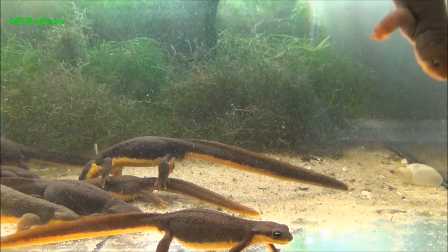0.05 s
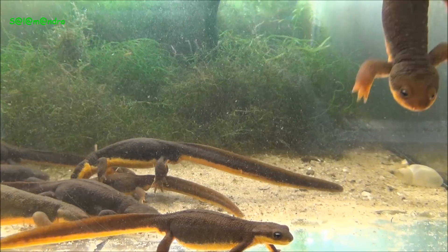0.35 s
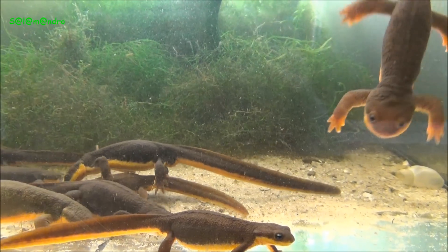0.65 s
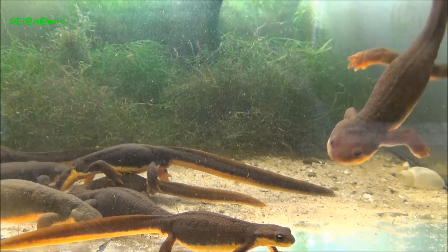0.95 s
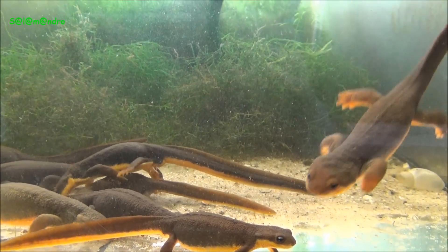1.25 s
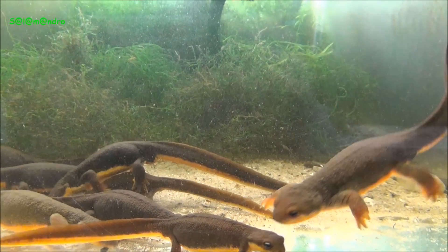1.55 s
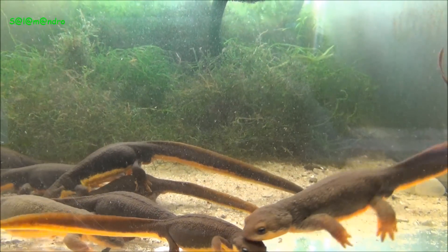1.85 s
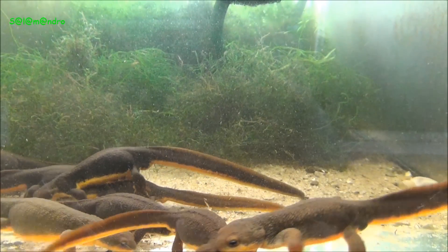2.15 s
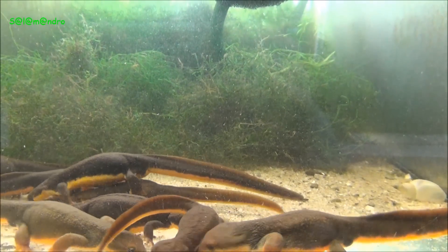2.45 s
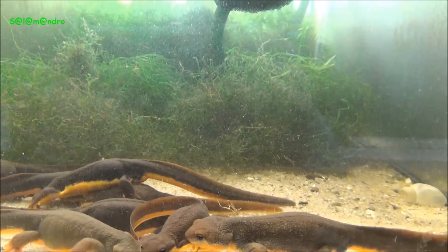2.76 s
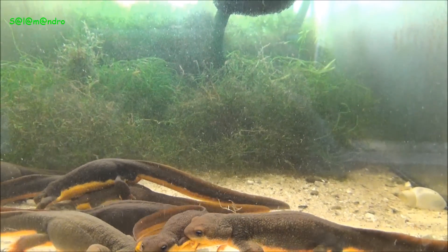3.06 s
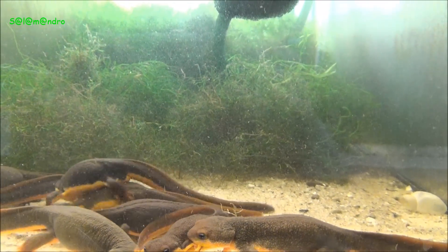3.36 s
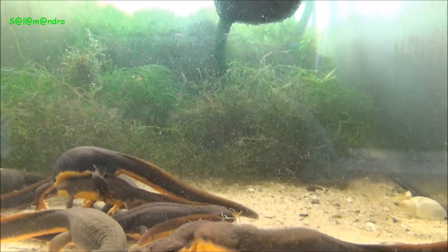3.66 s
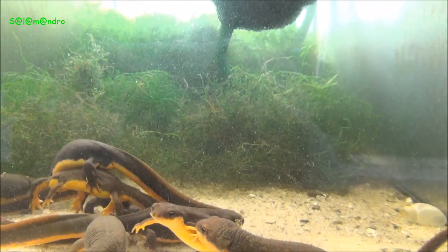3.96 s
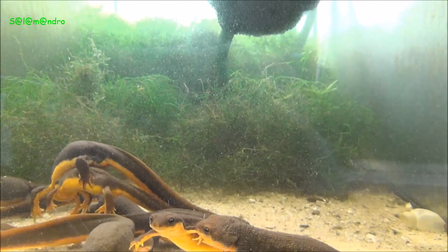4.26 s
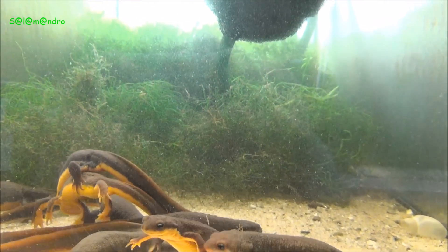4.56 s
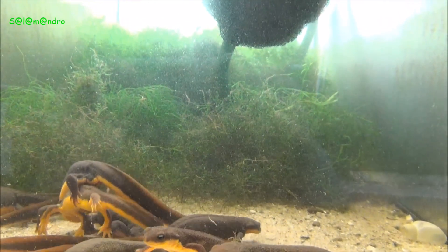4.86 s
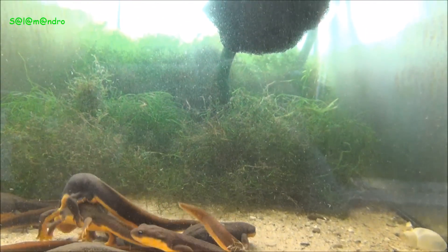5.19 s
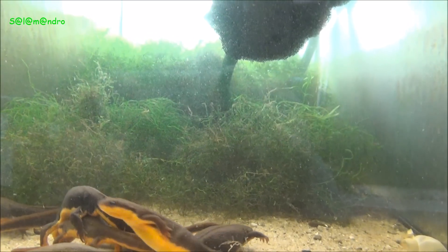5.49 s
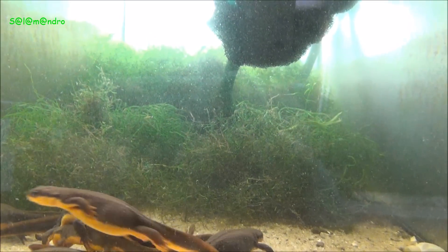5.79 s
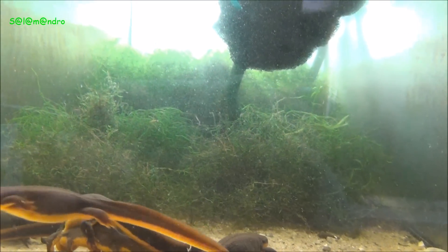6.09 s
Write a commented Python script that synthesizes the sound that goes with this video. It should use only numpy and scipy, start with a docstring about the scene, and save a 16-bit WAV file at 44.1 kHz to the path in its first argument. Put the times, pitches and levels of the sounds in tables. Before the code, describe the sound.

Close to the glass of an indoor aquarium, a pump hums steadily while circulating water rumbles, gurgles and fizzes with tiny bubbles. The hand-held camera adds a high whirr and faint finger rustles. A sharp plastic click about a second and a half in makes the background dip and slowly swell back. Another click follows, and near the end comes a cluster of clicks and rubbing on the casing.

```python
"""At an aquarium, close to the glass, a pump hums on 50 Hz mains power while the moving water
rumbles, gurgles and hisses softly with tiny bubbles. A hand-held camera adds its own whirr and a thin
whistle from its screen; fingers rub its plastic casing and make it click. The loudest click pushes
the camera's gain (its volume) down, and the hum takes about two seconds to swell back."""
import sys
import numpy as np
from scipy import signal
from scipy.fft import rfft, irfft
from scipy.io import wavfile
from scipy.ndimage import uniform_filter1d, minimum_filter1d

SR = 44100
rng = np.random.default_rng(int(sys.argv[2]) if len(sys.argv) > 2 else 0)


def output_pcm(signal):
    """Save a mono or channel-first signal as 16-bit PCM at the path in sys.argv[1].

    Samples are clipped to [-1, 1] before scaling.
    """
    pcm = np.clip(np.atleast_2d(signal).T, -1, 1) * 32767
    wavfile.write(sys.argv[1], SR, np.round(pcm).astype(np.int16))


N = 274743
T = np.arange(N) / SR
MAINS_HZ = 50


def undb(db):
    """Turn decibels into a number to multiply a sound by."""
    return 10 ** (np.asarray(db) / 20)


def unit(x):
    """Scale a signal so that its average strength (rms) is 1."""
    return x / np.sqrt(np.mean(x ** 2))


def pan(db):
    """Left and right gains, with the left louder by db."""
    return undb(np.array([[db], [-db]]) / 2)


def spread(mid, side, side_db):
    """Make stereo: both ears share mid; side is added on the left and taken away on the right."""
    return mid + undb(side_db) * side * np.array([[1], [-1]])


def noise():
    """White noise: an even mix of all pitches."""
    return rng.standard_normal(N)


def wander(per_s):
    """A smooth random curve, about 1 in size, that heads for a new value per_s times a second."""
    hold = int(SR / per_s)
    steps = np.repeat(rng.standard_normal(N // hold + 2), hold)
    return unit(uniform_filter1d(uniform_filter1d(steps, hold), hold)[:N])


def grains(per_s, scatter_db):
    """Tiny ticks of uneven size at random moments."""
    sizes = undb(scatter_db * np.minimum(rng.exponential(size=N), 4))
    return unit((rng.random(N) < per_s / SR) * np.sign(noise()) * sizes)


def response(points, size):
    """Join (pitch_hz, level_db) points into a curve with a gain for every pitch."""
    hz, db = np.transpose(points)
    pitches = np.maximum(np.fft.rfftfreq(size, 1 / SR), 1)
    return undb(np.interp(np.log(pitches), np.log(hz), db))


def colour(x, points):
    """Shape a sound's tone with (pitch_hz, level_db) points; the result has strength 1."""
    size = x.shape[-1]
    return unit(irfft(rfft(x) * response(points, size), size))


def resonate(x, hz, width_hz):
    """Keep a narrow band around one pitch, filtering twice for steeper edges."""
    b, a = signal.iirpeak(min(hz, .45 * SR), hz / width_hz, fs=SR)
    return unit(signal.lfilter(b, a, signal.lfilter(b, a, x)))


# The tones in the pump's hum: mains_multiple, level_db, left_minus_right_db, waver_db
HUM_TONES = [(1, -60, -6, 1), (2, -46, -10.5, 0.7), (4, -54, -10, 3), (6, -37, -3, 1)]

def pump(drone_hz=885, growth_db_per_s=0.92):
    """The motor shakes the tank, each tone wavering with the load; a higher drone slowly grows."""
    hum = 0
    for multiple, db, pan_db, waver_db in HUM_TONES:
        phase = 2 * np.pi * (round(multiple) * MAINS_HZ * T + rng.random())
        phase += 0.079 * waver_db * wander(4.6)
        hum = hum + np.sqrt(2) * np.sin(phase) * undb(db + waver_db * wander(7.4)) * pan(pan_db)
    mid, side = (resonate(noise(), drone_hz, width_hz=67) for _ in range(2))
    return hum + undb(-52 + growth_db_per_s * T) * spread(mid, side, side_db=-17) * pan(-2.4)


# How much the water differs between left and right: pitch_hz, side_minus_mid_db
WATER_WIDTH = [(25, 1), (60, 7), (130, -14), (300, -19.5), (700, -12), (1300, -20), (2200, -58),
               (16000, -36)]

def widen(x):
    """Spread a water sound between the ears, most of all in the deep bass."""
    side = irfft(rfft(noise()) * response(WATER_WIDTH, N), N)
    return spread(x, side, side_db=0)


# The tone of the churning water: pitch_hz, relative_level_db
CHURN_TONE = [(20, -31), (45, -19), (110, -13.5), (150, -6), (192, -1), (215, -5.5), (280, -1.5), (325, 0),
              (420, -3), (480, -10), (780, -12), (1000, -16), (1700, -26.5), (4000, -79)]

def churn():
    """Pumped water circles the tank with a nearly even rumble."""
    return colour(widen(noise()), CHURN_TONE) * undb(-37.5 + .5 * wander(4.94)) * pan(-2)


def gurgle():
    """The tank's lowest resonance, a pitch it naturally rings at, gurgles on and off."""
    return resonate(noise(), hz=192, width_hz=34) * undb(-45.5 + 3 * wander(18)) * pan(-7.5)


def glass_echoes(x, echo_db=-12, longest_s=.03, count=40):
    """Quick echoes off the panes and nearby walls boost some pitches and weaken others."""
    delays = rng.integers(80, int(longest_s * SR), count)
    echoes = sum(rng.choice([-1, 1]) * np.roll(x, delay, axis=-1) for delay in delays)
    return unit(x + undb(echo_db) * echoes / np.sqrt(count))


# The tone of the water's hiss: pitch_hz, relative_level_db
HISS_TONE = [(500, -15.5), (1200, -0.5), (1750, -2), (2100, 1.6), (3200, -0.1), (4000, 3), (5200, -1),
             (8000, -1.5), (10500, -4), (12500, -10.5), (15500, -12.5)]

def hiss():
    """Moving water hisses with a fine fizz, in small, uneven swells."""
    fizzy = noise() + 0.37 * grains(per_s=700, scatter_db=1.5)
    return glass_echoes(colour(widen(fizzy), HISS_TONE)) * undb(-40 + 0.9 * wander(24))


def bubbles(per_s=190, low_hz=2100, high_hz=5500, ring_cycles=130, rise=.04, size=4096):
    """Each tiny bubble in the outflow rings with a short ping that rises a little in pitch."""
    out = np.zeros(N + size)
    t = T[:size]
    for when, pitch, bulk in rng.random((int(per_s * N / SR), 3)):
        hz = low_hz * (high_hz / low_hz) ** pitch
        age = t * hz / ring_cycles  # reaches 1 when the ping has faded by 60 dB
        fade = np.exp(-np.log(1000) * age) * np.minimum(20 * age, 1)
        ping = np.sin(2 * np.pi * hz * t * (1 + rise * age / 2)) * fade
        level_db = -47.5 + 1.8 * min(-np.log(1 - bulk), 2)
        start = int(when * N)
        out[start:start + size] += undb(level_db) * ping
    return out[:N]


# The tone of the camera motor's broad whirr: pitch_hz, relative_level_db
WHIRR_TONE = [(4000, -77), (5500, -8), (6200, 6.5), (6900, 6), (7600, 8), (8450, 2), (8700, -1.5),
              (12000, -44.5)]
# The narrow bands where the motor rings: pitch_hz, base_width_hz, level_db
MOTOR_RINGS = [(2514, 8.8, -69.5), (5600, 21, -58), (5880, 54, -76), (5990, 19, -53.5), (6410, 116, -46.5),
               (6600, 39, -54), (8240, 40, -53), (8420, 23, -53.5), (10800, 60, -65)]

def camera_motor():
    """The camera's drive motor whirrs and rings at a few high pitches that waver in loudness."""
    band = spread(colour(noise(), WHIRR_TONE), colour(noise(), WHIRR_TONE), side_db=-6)
    whirr = glass_echoes(band) * undb(-39 + 0.49 * wander(27))
    for hz, base_width_hz, db in MOTOR_RINGS:
        mid, side = (resonate(noise(), hz, 1.3 * base_width_hz) for _ in range(2))
        whirr += undb(db + 1.2 * wander(7)) * spread(mid, side, side_db=-7)
    return whirr


def screen_whistle(line_hz=15625):
    """The camera's screen whistles as it draws its lines, fading during each sweep down the picture."""
    fade = np.exp(-(T * MAINS_HZ % 1) / .2)
    return undb(-59.5) * resonate(fade * np.sin(2 * np.pi * line_hz * T), line_hz, width_hz=700)


# Light finger brushes on the casing: middle_s, length_s, pitch_hz, width_share_of_pitch, level_db
FINGER_BRUSHES = [(0.113, 0.048, 2610, 0.11, -39.5), (.135, 0.057, 4170, .13, -40),
                  (.36, 0.28, 7700, 0.32, -38.5), (.425, .04, 10500, .4, -43),
                  (0.463, 0.046, 2590, .09, -46), (.58, .04, 4100, 0.23, -45),
                  (0.894, 0.05, 7500, 0.2, -34.5), (0.938, 0.037, 9000, 0.64, -42),
                  (1.116, 0.036, 2200, 0.65, -43.5), (1.223, 0.03, 4040, 0.13, -42),
                  (1.228, 0.022, 2300, 0.1, -44), (1.34, 0.027, 4400, .2, -44), (1.79, .04, 9500, .15, -41),
                  (2.416, .059, 2610, 0.16, -41.5), (2.41, .04, 4400, .2, -45),
                  (2.676, .06, 7460, 0.2, -35), (3.417, 0.067, 2460, 0.26, -39.5),
                  (3.595, 0.076, 4100, 0.27, -43), (3.86, 0.091, 6340, 1.1, -41),
                  (4.045, 0.14, 3900, 0.44, -44), (4.064, 0.14, 7900, 0.24, -40),
                  (4.233, 0.028, 8600, 0.13, -41), (4.28, 0.12, 6000, 1.2, -38),
                  (4.353, 0.038, 5700, 0.17, -40), (4.581, 0.033, 4300, .4, -40),
                  (4.833, 0.076, 3700, 0.23, -45.5), (5.175, 0.028, 4200, 0.21, -38),
                  (5.223, 0.07, 3940, 0.16, -37.5), (5.566, 0.098, 4300, 0.29, -43),
                  (5.653, 0.054, 2300, 0.22, -44), (5.83, 0.12, 3700, 0.93, -35),
                  (5.857, .04, 9700, .2, -42), (5.912, 0.065, 7300, 0.32, -35.5), (6, 0.062, 8450, .3, -35)]

def finger_brushes():
    """Skin sticks and slips on plastic; the tiny slips blur into short, pitched rustles."""
    out = np.zeros(N)
    slips = grains(per_s=2000, scatter_db=2)
    for middle_s, length_s, hz, width_share, db in FINGER_BRUSHES:
        swell = np.exp(-(2 * (T - middle_s) / length_s) ** 2)
        out += undb(db) * swell * resonate(slips, hz, width_share * hz)
    return out


def bell(distance, width):
    """A bell-shaped curve: 1 at distance zero, falling away on both sides."""
    return np.exp(-.5 * (distance / width) ** 2)


def impulse(points, size):
    """The sound of an object with this tone after one sharp push."""
    # The cepstrum describes the tone; folding it in half puts all the ringing after the push.
    cepstrum = irfft(np.log(response(points, size)))
    cepstrum[1:size // 2] *= 2
    cepstrum[size // 2 + 1:] = 0
    return irfft(np.exp(rfft(cepstrum)))


def chatter(x, longest_s, count=48):
    """Smear a snap by giving each range of pitches its own small delay."""
    size = len(x)
    delays_s = longest_s * rng.random(count) ** 2
    smooth_s = np.interp(np.linspace(0, 1, size // 2 + 1), np.linspace(0, 1, count), delays_s)
    return irfft(rfft(x) * np.exp(-2j * np.pi * np.cumsum(smooth_s) * SR / size), size)


# The notes the casing rings at: pitch_hz, relative_level_db, ring_s (time to fade by 60 dB)
CASING_NOTES = [(860, -4, .045), (1236, -3, .036), (1620, -11, .026), (1960, -3, .032), (2110, -9, .032),
                (2630, -13, .038), (3620, -9, .021), (4680, -4, .018), (5020, -4, .018), (5770, -7, .02),
                (6400, -11, .016), (7200, -8, .02), (8200, -8, .016), (10000, -16, .012)]

def casing_humps(points, depth_db):
    """Add a hump to a tone curve at each of the casing's notes."""
    pitches = np.geomspace(60, 16000, 500)
    hz, db = np.transpose(points)
    humps = sum(undb(note_db / 2) * bell(np.log(pitches / note_hz), .045)
                for note_hz, note_db, _ in CASING_NOTES)
    return np.c_[pitches, np.interp(np.log(pitches), np.log(hz), db) + depth_db * humps]


# The overall tone of the casing: pitch_hz, relative_level_db
CASING_TONE = [(300, -7), (850, -5.5), (1500, 1), (2000, -2), (2700, 2.5), (3700, 1), (4700, 4.5),
               (6400, -3), (8300, 2), (10500, 9.5), (11900, 0), (12800, -18), (16000, -27)]
# The casing's clicks: start_s, level_db, brightest_hz, width_octaves, top_hz,
# favoured_hz, favoured_boost_db, relative_thud_db
CASING_CLICKS = [(1.34, -35.5, 2270, 0.45, 7000, 2110, 9, -20),
                 (1.498, -19.5, 5340, 0.59, 8700, 2110, 15, -30),
                 (1.516, -12.5, 4970, 0.53, 13000, 2140, 12, -30),
                 (2.1992, -20, 1570, 0.76, 10300, 1960, 2, -14),
                 (5.372, -39.5, 3000, 0.43, 8000, 2630, 9, -23),
                 (5.4964, -30.5, 3080, 0.29, 8000, 2630, 17, -10),
                 (5.732, -25, 3070, 1.6, 8440, 3620, 2, -2), (5.766, -40, 5000, 0.8, 8000, 4650, 2, -20),
                 (6.003, -31.5, 2050, 0.42, 7000, 2630, 2, -19),
                 (6.0506, -25.5, 2700, 0.64, 8000, 2630, 21, 2.5),
                 (6.084, -35, 4100, .35, 8000, 3620, 6, -20),
                 (6.115, -29.5, 1790, 0.36, 7000, 1620, 14, -20),
                 (6.128, -42, 5500, .5, 8500, 5770, 6, -22), (6.173, -17, 7750, 0.28, 10000, 8200, 16, -30),
                 (6.2232, -25, 5950, 0.13, 8000, 5770, 14, -20)]

def casing_clicks(thud_hz=404, chatter_cycles=4.3, size=4096):
    """The pressed casing snaps, rings, rattles and thuds; the spot pressed decides which note leads."""
    out = np.zeros((2, N + size))
    t = T[:size]
    pitches, casing_db = casing_humps(CASING_TONE, depth_db=9).T

    def decay(ring_s):
        """A fade that falls by 60 dB in ring_s."""
        return np.exp(-np.log(1000) * t / ring_s)

    for start_s, db, bright_hz, octaves, top_hz, favoured_hz, boost_db, thud_db in CASING_CLICKS:
        def contact(hz):
            """How strongly this press stirs each pitch."""
            return (bell(np.log2(hz / bright_hz), octaves) + undb(-17)) / np.hypot(1, (hz / top_hz) ** 5)

        tone = np.c_[pitches, casing_db + 20 * np.log10(contact(pitches))]
        snap = unit(impulse(tone, size)) * np.sqrt(.006 * SR / size)  # the energy of 6 ms at strength 1
        ring = 0
        for hz, note_db, ring_s in CASING_NOTES:
            favour_db = boost_db * bell(np.log(hz / favoured_hz), .03)
            strength = undb(note_db - 2 + favour_db) * contact(hz)
            ring = ring + strength * decay(ring_s) * np.sin(2 * np.pi * hz * t)
        chatter_s = chatter_cycles / bright_hz
        struck = chatter(snap + ring, chatter_s) * (t < t[-1] / 2)
        mid, side = colour(rng.standard_normal((2, size)), tone)
        rattle_s = 0.03 * (2000 / bright_hz) ** 0.24  # brighter clicks die sooner
        fade = decay(rattle_s) * np.minimum(t / chatter_s, 1)
        rattle = undb(-7) * fade * spread(mid, side, side_db=-3)
        thud = undb(thud_db) * decay(.045) * np.sin(2 * np.pi * thud_hz * t)
        start = int(start_s * SR)
        out[:, start:start + size] += undb(db) * (struck + thud + rattle)
    return out[:, :N]


# The tone of the hand sliding over the casing: pitch_hz, relative_level_db
GRIP_TONE = [(60, -9), (300, -15), (800, -7.5), (1900, -7), (2500, 0.5), (4000, 3), (4900, -2), (5700, 2),
             (6800, 1.5), (8000, 2.5), (9500, -9), (15000, -36)]
# Each slide of the hand: start_s, length_s, starting_level_db, growth_db_per_s
GRIP_SLIDES = [(5.708, 0.064, -32.5, 10), (5.975, 0.079, -31.5, 24), (6.054, 0.085, -28.5, 70),
               (6.191, 0.04, -27.5, 93)]

def sliding_grip(attack_s=0.012, let_go_db_per_s=1000):
    """The hand judders over the casing, louder as it presses harder, dying away as it lets go."""
    judder = undb(2 * np.minimum(wander(330), 1.5))
    pressure = np.zeros(N)
    for start_s, length_s, db, growth_db_per_s in GRIP_SLIDES:
        age_s = T - start_s
        press_db = growth_db_per_s * np.clip(age_s, 0, length_s)
        let_go_db = let_go_db_per_s * np.maximum(age_s - length_s, 0)
        pressure += np.clip(age_s / attack_s, 0, 1) * undb(db + press_db - let_go_db)
    tone = casing_humps(GRIP_TONE, depth_db=7)
    mid, side = (colour(grains(per_s=3400, scatter_db=-0.5), tone) for _ in range(2))
    return pressure * judder * spread(mid, side, side_db=-18.5)


def scene():
    """The tank, the camera and the hand that holds it, all added together."""
    tank = pump() + churn() + gurgle() + hiss() + bubbles()
    camera = camera_motor() + screen_whistle()
    hand = casing_clicks() + finger_brushes() + sliding_grip()
    return tank + camera + hand


def lag(x, time_s):
    """Follow a signal slowly, smoothing out changes quicker than time_s."""
    keep = np.exp(-1 / (time_s * SR))
    return signal.lfilter([1 - keep], [1, -keep], x)


def gain_control(x, threshold_db=-20, cut_share=.64, recovery_db_per_s=2.1):
    """A loud burst makes the camera turn its volume down at once; it creeps back at a steady rate."""
    level_db = 10 * np.log10(lag(np.mean(x ** 2, axis=0), time_s=0.0082) + 1e-12)
    cut_db = cut_share * np.maximum(level_db - threshold_db, 0)
    held_db = np.maximum.accumulate(cut_db + recovery_db_per_s * T) - recovery_db_per_s * T
    return x * undb(-lag(held_db, time_s=0.0017))


def limiter(x, ceiling=0.89, size=64):
    """Turn the volume down smoothly around any peak above the ceiling."""
    gain = np.minimum(1, ceiling / (np.abs(x).max(axis=0) + 1e-9))
    return x * uniform_filter1d(minimum_filter1d(gain, size), size)


def record(dry):
    """The camera adjusts its volume, tames the peaks and cuts off the highest treble."""
    top_hz = 15780
    treble_cut = signal.ellip(10, .2, 70, top_hz, fs=SR, output="sos")
    return signal.sosfilt(treble_cut, limiter(gain_control(dry)))


dry = scene()
out = record(dry)
output_pcm(out)
```